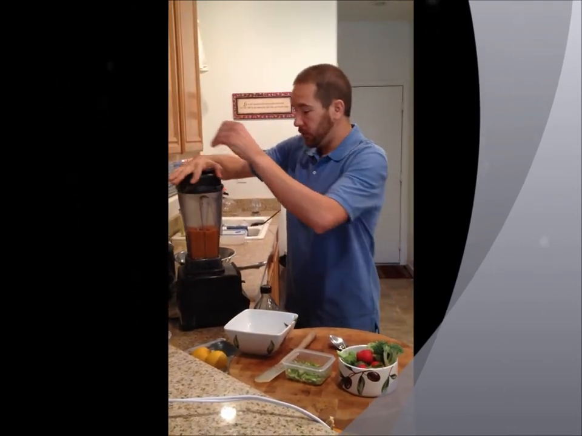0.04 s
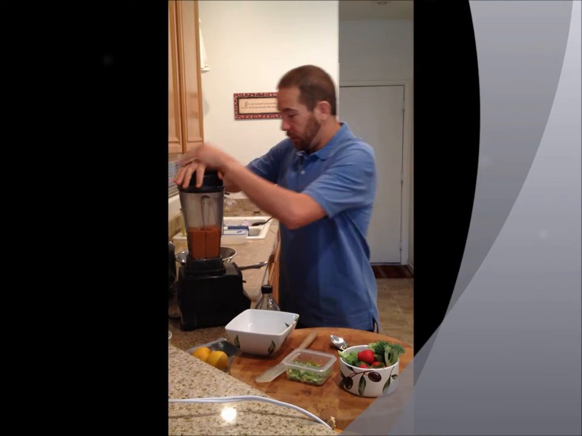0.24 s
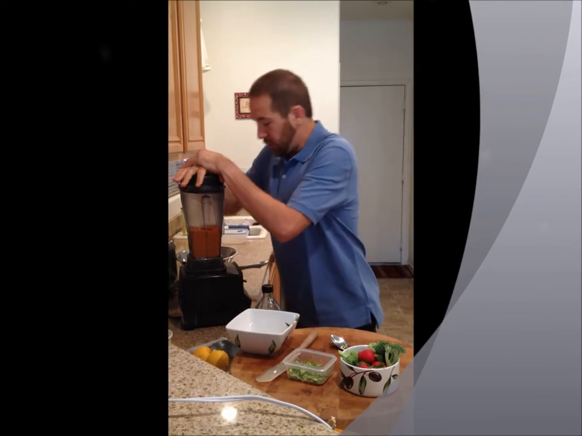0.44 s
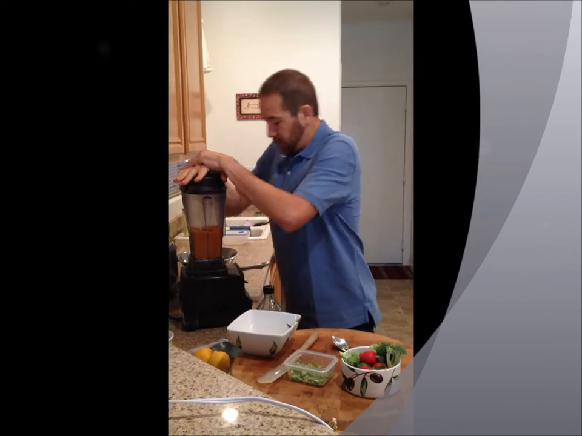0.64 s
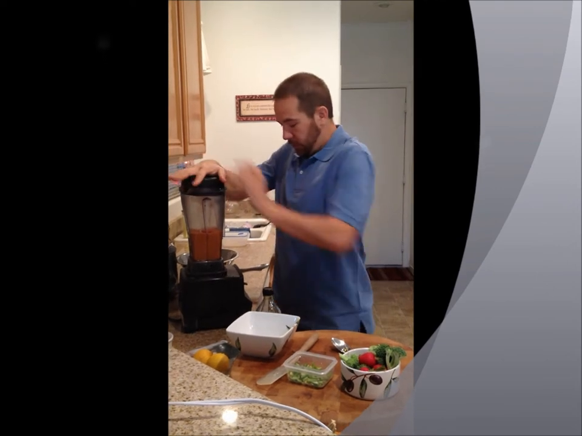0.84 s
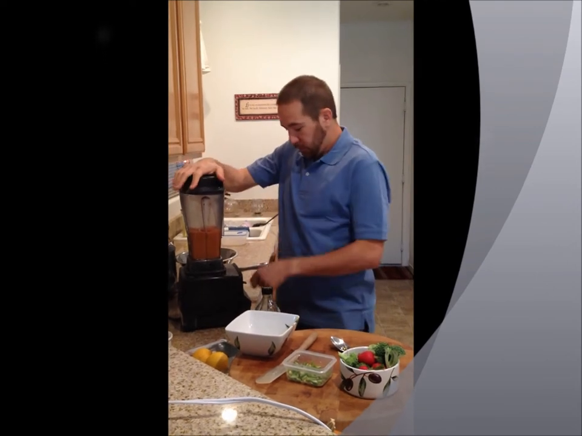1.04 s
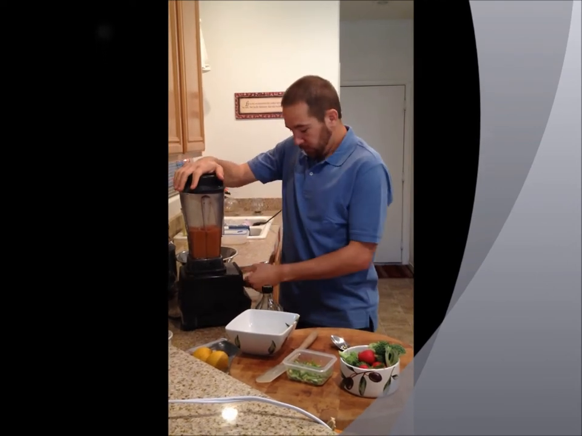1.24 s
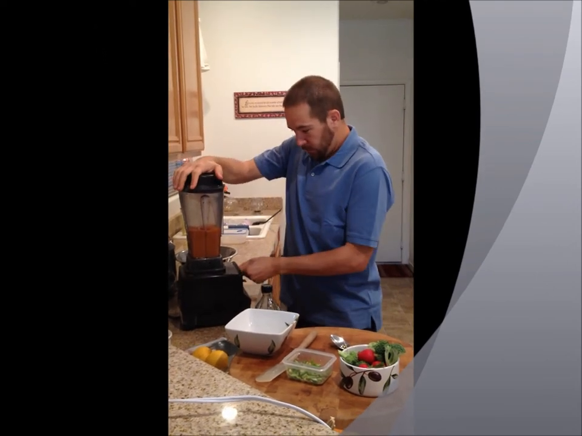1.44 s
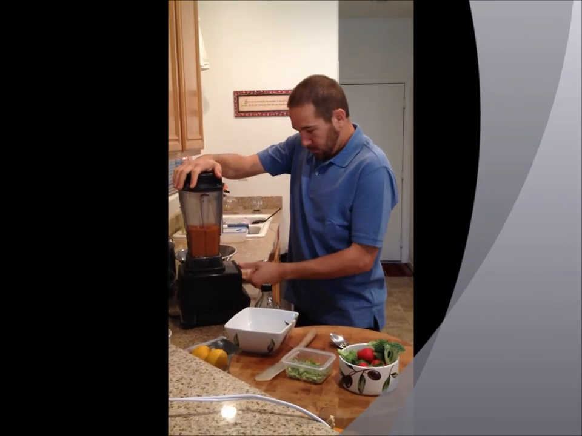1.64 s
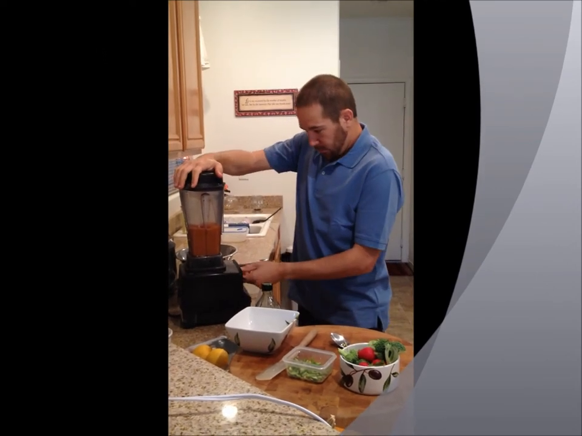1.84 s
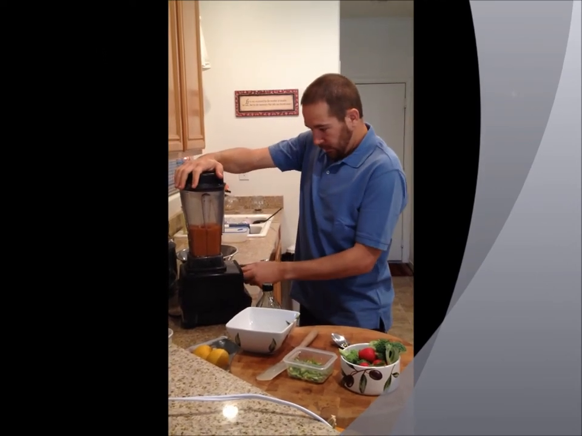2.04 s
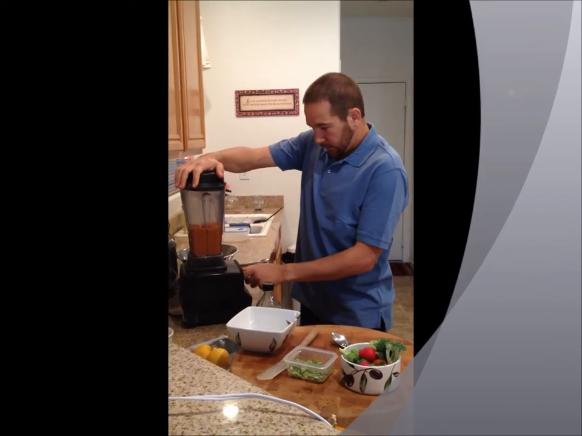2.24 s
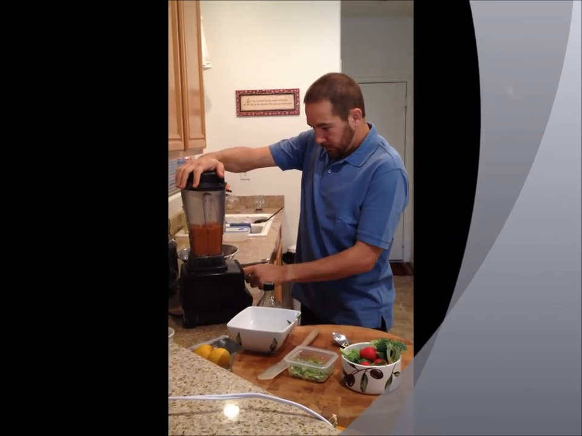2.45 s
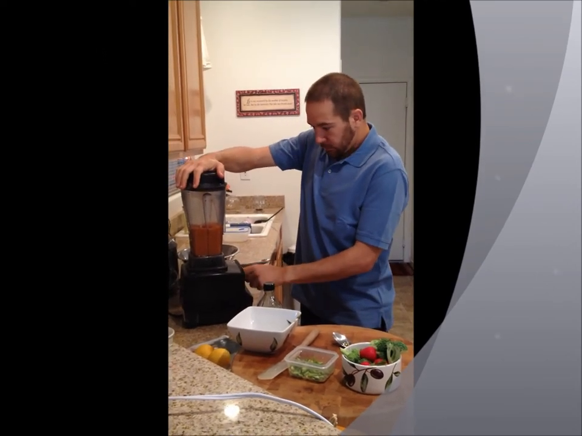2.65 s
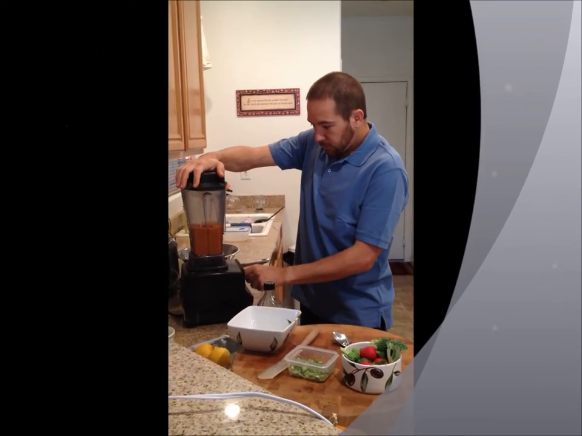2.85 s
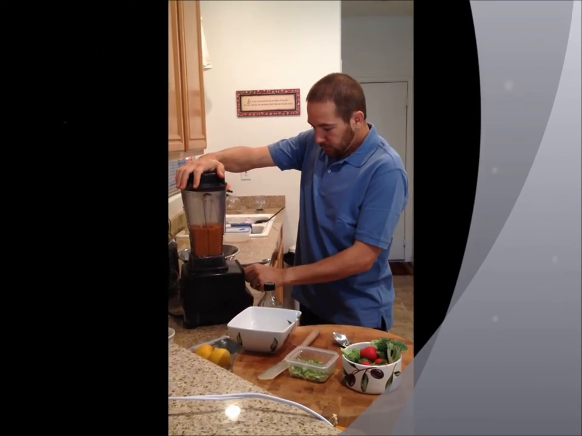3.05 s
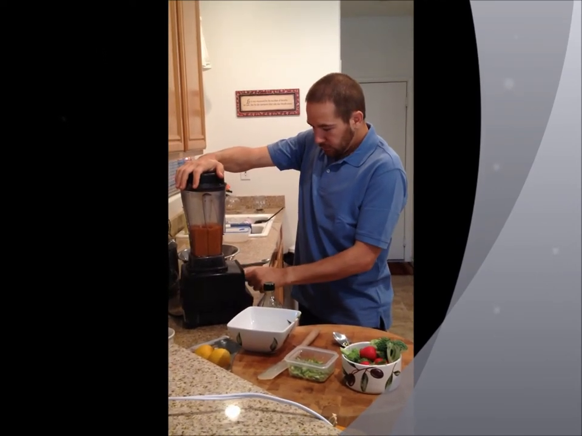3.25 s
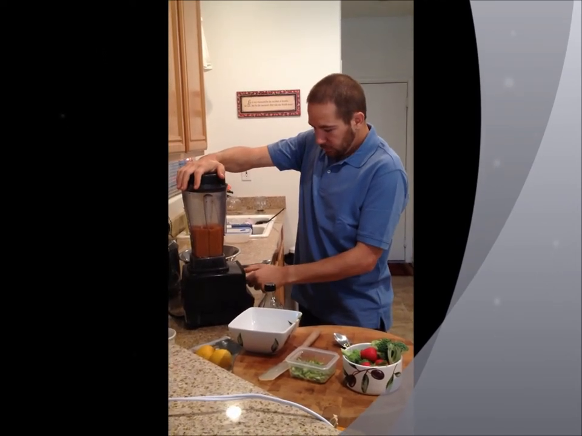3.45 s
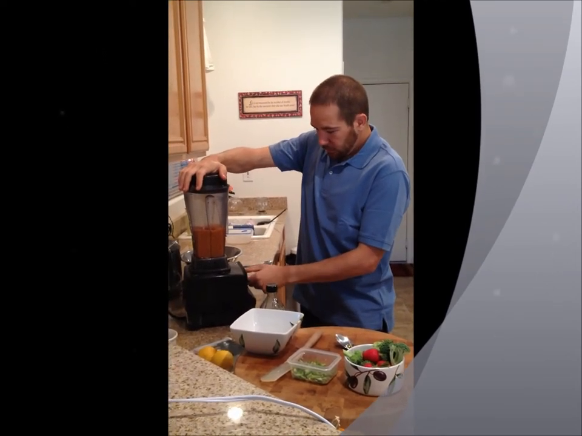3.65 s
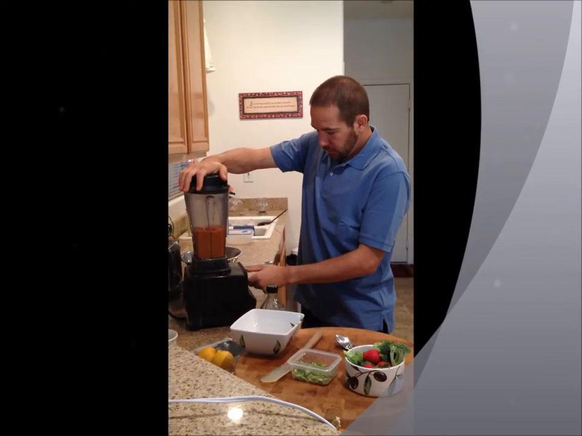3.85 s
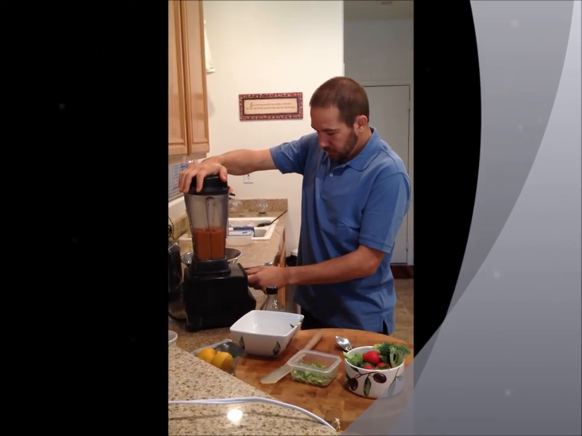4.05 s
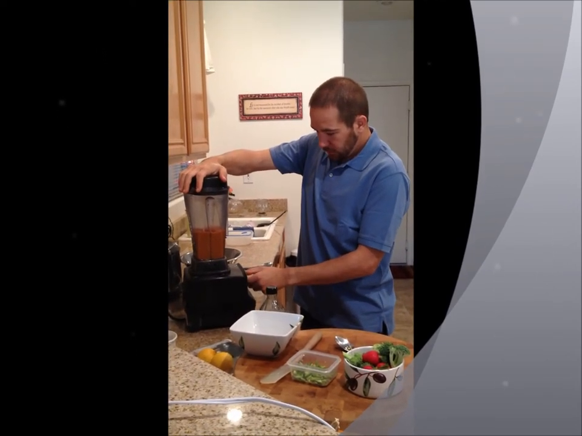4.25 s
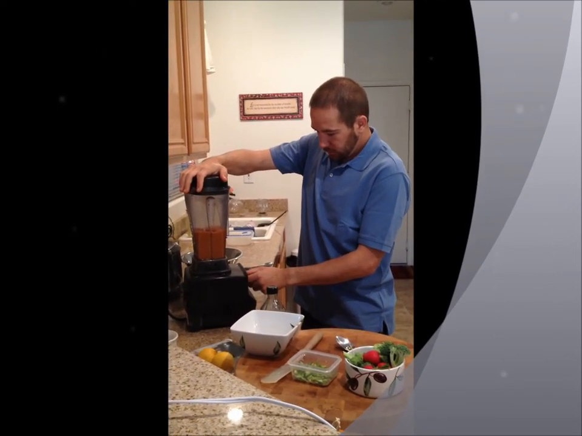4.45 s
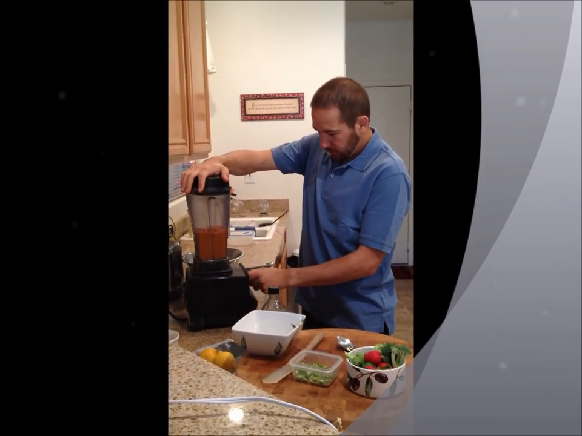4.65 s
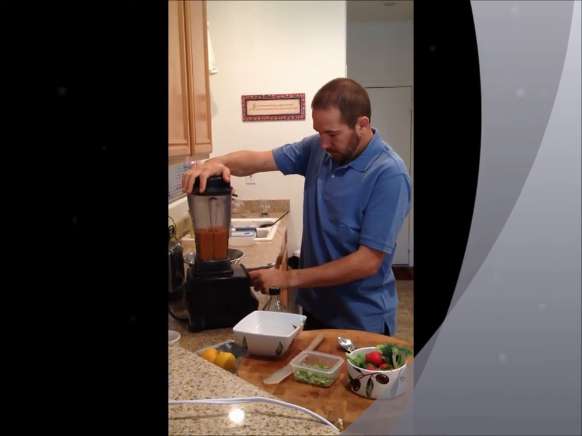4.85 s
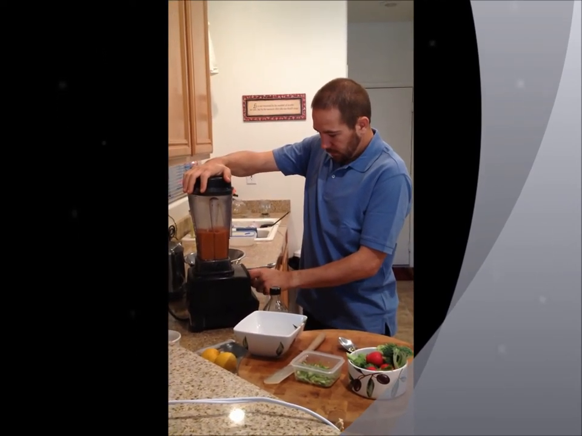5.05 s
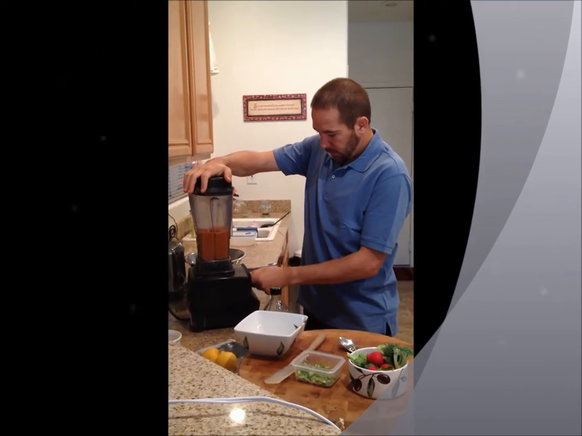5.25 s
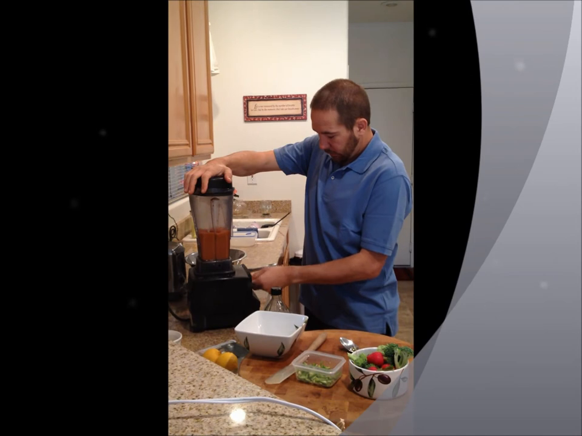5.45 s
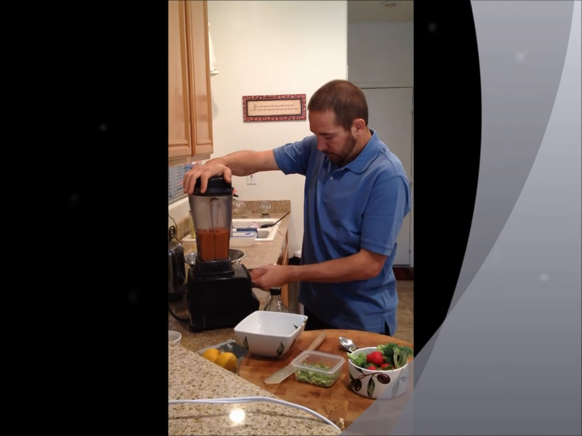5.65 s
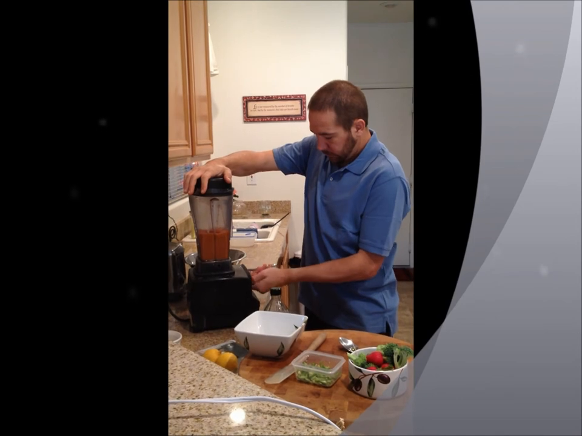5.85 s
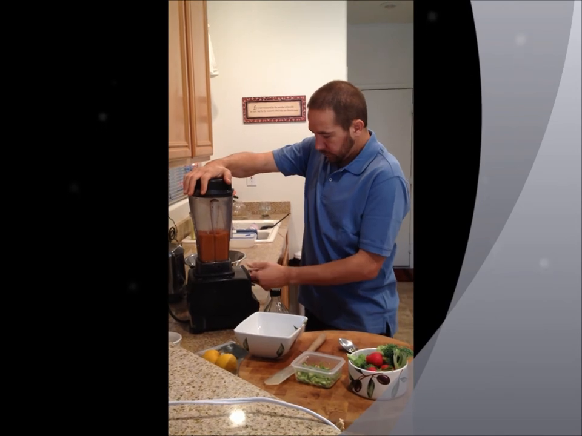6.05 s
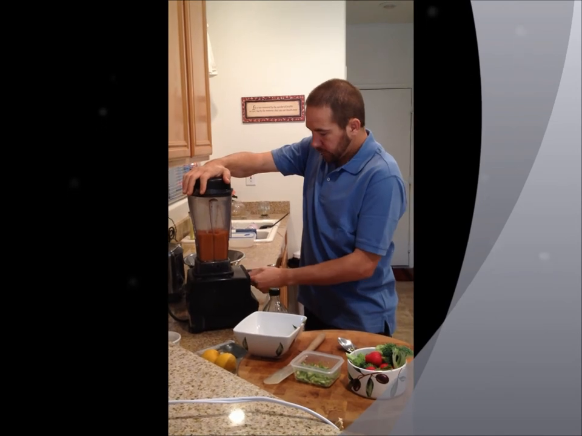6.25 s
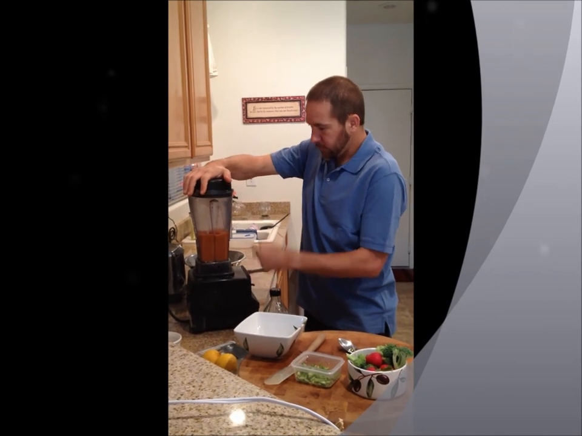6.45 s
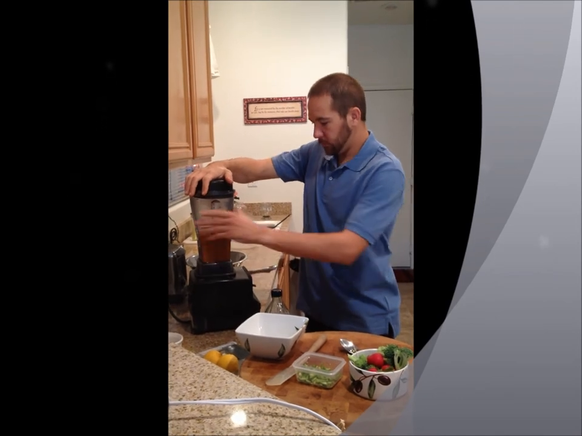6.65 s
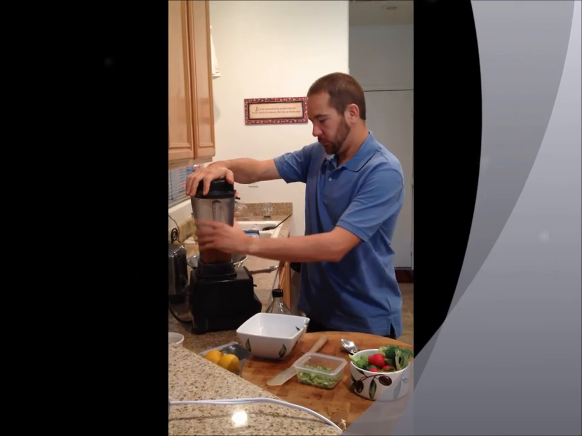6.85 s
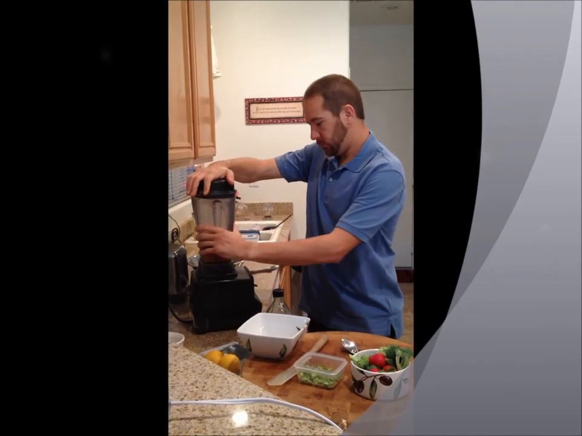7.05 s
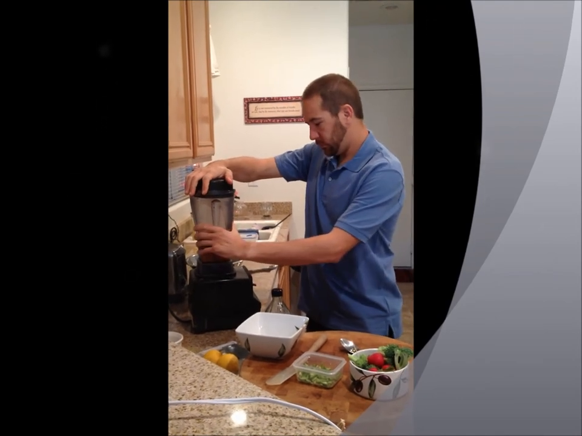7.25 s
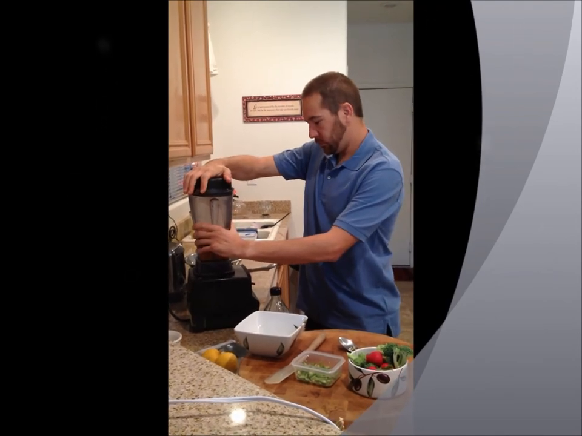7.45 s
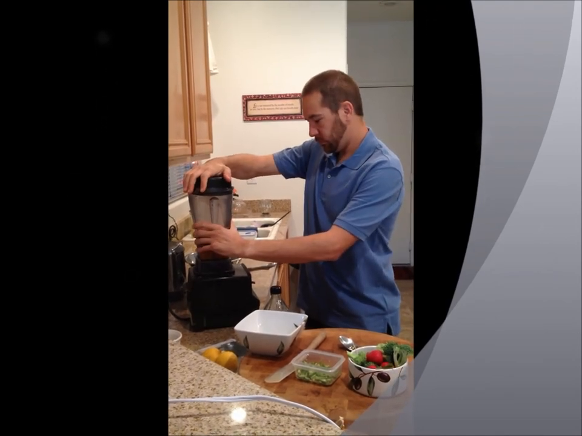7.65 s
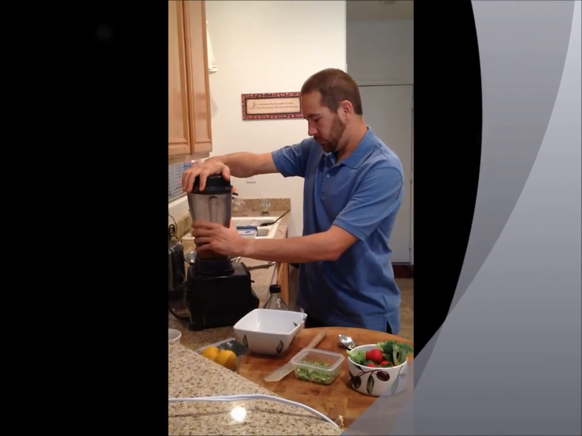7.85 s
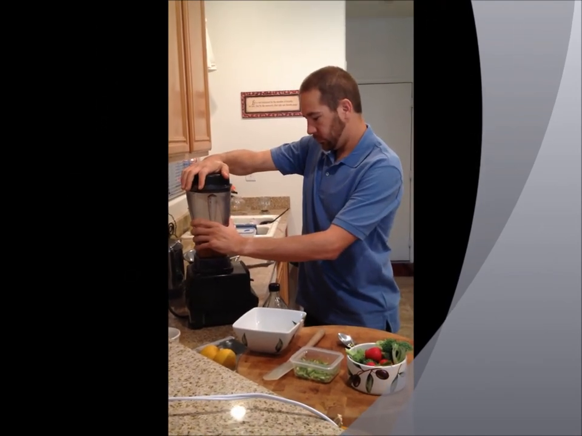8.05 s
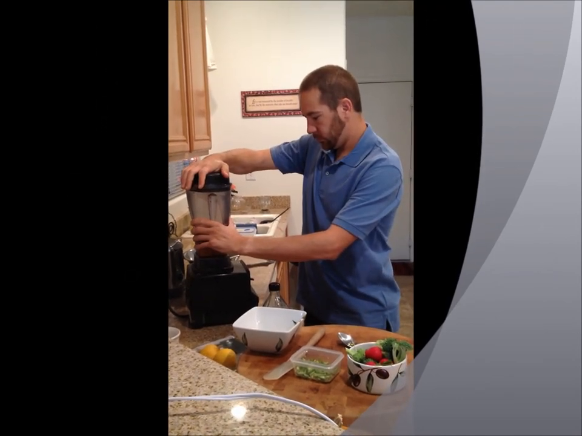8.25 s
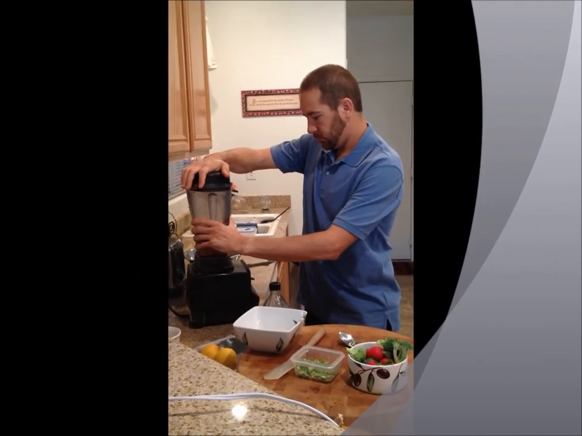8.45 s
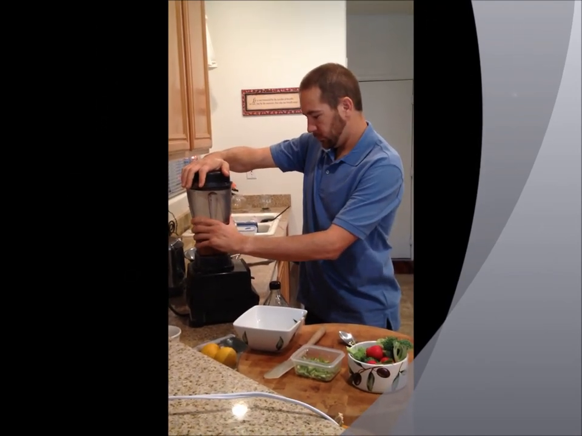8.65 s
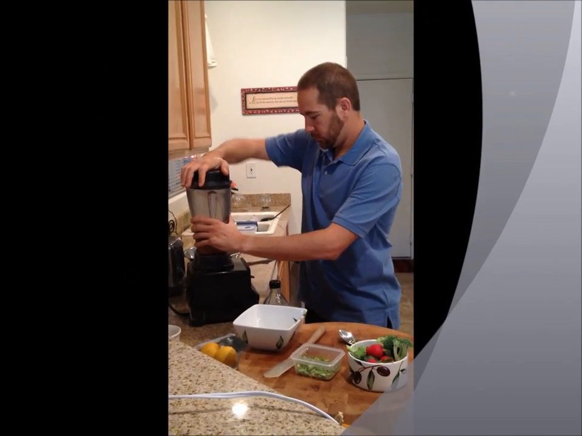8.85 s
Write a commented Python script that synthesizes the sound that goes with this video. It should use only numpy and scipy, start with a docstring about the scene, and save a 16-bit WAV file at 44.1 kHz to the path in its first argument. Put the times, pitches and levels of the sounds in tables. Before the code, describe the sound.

A faint kitchen murmur, slightly louder at first, begins with a tiny bright tick and soft hand brushing. At 0.4 s a firm double knock lands on the plastic lid, with a thud and short room echo. Faint touches come near 0.8 and 1.1 s, then crisp switch clicks at 1.4 s. From about 1.65 s the motor starts with buzzing pulses and uneven low knocks, jumps to a low growl by 2.4 s and holds briefly. From 2.8 s it climbs quickly, pauses at 3.4-3.7 s, then climbs again to a loud peak around 5.1 s: a throbbing hum, wet churning, broad hiss and unsteady whine. After 5.3 s the pitch starts sliding down; a bright click comes at 6.2 s and a duller knock at 6.8 s. The whirr thins and slows through 8 s, almost gone by 8.8 s, when a faint tick sounds. Single distant microphone, little bass.

```python
"""First a small dry tick, a brush of hands and a kitchen murmur that settles; then a blender on a stone counter.
Hands knock lid, base and switch: short bursts and ringing plastic, with the room's answer.
The motor starts with jolts, climbs in stages, then coasts down. It adds tones locked to the shaft, a whine,
and churning, hissing and shuddering noises that throb once a turn. One small microphone hears it across the room."""
import sys
import numpy as np
from scipy import signal
from scipy.fft import rfft, irfft, next_fast_len
from scipy.io import wavfile
from scipy.ndimage import uniform_filter1d, map_coordinates

SR = 44100
rng = np.random.default_rng(int(sys.argv[2]) if len(sys.argv) > 2 else 0)


def store_wav(level_fs):
    """Save 16-bit WAV to argv[1]."""
    pcm = np.round(np.clip(np.atleast_2d(level_fs), -1, 1) * 32767)
    wavfile.write(sys.argv[1], SR, pcm.T.astype(np.int16))


N = 392490
TIME = np.arange(N) / SR  # seconds

# Shaft speed in stages; coasting starts at the last row: t/s, speed/(turns/s)
SPEED = [(1.68, 12), (2.3, 52), (2.4, 65), (2.5, 65.5), (2.57, 62.8), (2.66, 66), (2.8, 72), (3.05, 89.1),
         (3.2, 119.2), (3.4, 165), (3.7, 165), (3.93, 185.2), (4.03, 214), (4.14, 249), (4.27, 265),
         (4.45, 301), (4.6, 318.4), (4.8, 339.1), (5.1, 358.7), (5.25, 356.7), (5.4, 331.2)]
COAST_S, COAST_POWER = 4.107, 2.009  # speed then falls as (1 - time / COAST_S) ** COAST_POWER
POWER_OFF_S = 6.06  # middle of the fade from the sound under power to the unpowered sound
# Shaft tones at 260 turns/s, before load and path: multiple of shaft speed, level/dB
SHAFT_TONES = [(1, -13.5), (2, -22), (3, -25), (4, -20), (5, -26), (6, -26), (7, -27), (8, -23), (9, -24),
               (10, -26), (11, -28), (12, -25), (13, -24), (14, -27), (15, -26), (16, -24), (17, -28),
               (18, -26), (19, -27), (20, -25), (21, -30), (22, -25), (23, -33), (24, -32)]
# How steady shaking reaches the microphone, with notches between modes: f/Hz, level/dB
SHAKE_PATH = [(90, -48), (135, -29), (168, -23), (190, -23), (214, -13), (226, -6), (234, -3), (241, -11),
              (249, -30), (256, -5), (262, 0), (270, -6), (281, -20), (293, -10), (315, -27), (345, -23),
              (390, -29), (442, -16), (475, -26), (520, -14.5), (600, -30), (685, -18), (735, -25),
              (785, -18), (815, -24), (880, -18), (990, -26), (1085, -21), (1200, -27), (1330, -17),
              (1450, -18), (1650, -21), (1800, -29), (2500, -38)]
# Modes of base and counter: f/Hz, width/Hz, level/dB
BASE_MODES = [(178, 13, -50), (236.4, 1.84, 1), (261.7, 7.6, 1), (296, 17, -6.5), (333.6, 7.1, -2.5),
              (419.5, 5.9, -21), (419, 8, -14), (465, 27, -18.5)]
# Peaks and dips of jar and casing: f/Hz, width/Hz, level over the smooth spectrum/dB
CASING_PEAKS = [(696, 55, 2), (842.5, 14, 5.5), (830, 90, 0), (1092.7, 21, 8), (1320, 110, 3),
                (1360, 23, 3), (1573, 10, 2.5), (2000, 200, 4), (2700, 140, 3), (4064, 150, 3.5),
                (4770, 220, 3.5), (5145, 360, -9.5), (6040, 490, 6), (6750, 130, 5), (7880, 37, -4),
                (7860, 56, 3.5), (6770, 50, 2), (8800, 88, 0), (9560, 110, -17)]
# Colour of the churning at full speed: f/Hz, level/dB
CHURN_FULL = [(240, -24.5), (400, 2), (486, -3.5), (1090, -0.5), (1580, -10.5), (2000, -10.5),
              (2270, -25.5), (3000, -28), (3900, -28), (6600, -120)]
# Colour of the churning at low speed: f/Hz, level/dB
CHURN_SLOW = [(260, -13.5), (450, -13), (604, -11.5), (934, 2.5), (1190, -8), (1390, -1), (2250, -15),
              (3000, -12.5), (3900, -13.5), (6600, -120)]
# Colour of the fan hiss at full speed: f/Hz, level/dB
FAN_FULL = [(1290, -22), (2200, -10.5), (3690, -7), (4680, -3), (5240, -4), (5980, -7.5), (7770, -6.5),
            (9160, -10), (10200, -18.5), (14500, -23), (15600, -24)]
# Colour of the fan hiss at low speed: f/Hz, level/dB
FAN_SLOW = [(1290, -8), (2200, -14), (2700, -39), (3500, -3), (4650, 3.5), (5170, 1.5), (5990, -8),
            (7580, -5), (9220, -20.5), (14200, -20.5), (15400, -45)]
# How each noise follows speed, one tuple per noise: level at 340 turns/s/dB, growth per tenfold speed/dB,
# speed below which it stops falling/(turns/s), extra under power/dB, random swell/dB,
# unpowered speed where the next column sets in/(turns/s), loss per tenfold below that (negative: gain)/dB,
# fully in at t/s
CHURN_LAW = (-28, 26, 8, 1, 0.52, 34, 34, 1.4)
FAN_LAW = (-28.5, 36.5, 10, 0.26, 0.26, 73, -7, 1.73)
SHUDDER_LAW = (-30.5, 31.5, 114, 1, 0.3, 137, 25, 2.5)
START_S = .03  # time scale of the noises' swell at the start
# Brief surges and dips of churn, hiss and shudder: t/s, churn/dB, hiss/dB, shudder/dB
SURGES = [(1.77, 8, 20, 5), (1.86, 1.5, -2, 5), (1.96, 1, 7, 3), (2.05, 8, 4.5, -7), (2.36, 5, 6.5, 3),
          (2.47, 1, -1.5, -14), (2.66, 7, 9.5, 7.5), (2.9, 1.5, 1, 1), (3.06, 0.5, 3.5, 4.5),
          (3.25, -1, 3, 11), (4.31, 1, -1, 3), (4.95, 3.5, 1.5, 3), (5.22, 3, 2.5, -0.5),
          (6.15, 0.5, -2, -2), (6.61, -1.5, 2.5, 2), (6.87, -1, 1.5, -8), (7.2, -0.5, 3.5, -8),
          (7.62, 3.5, 4.5, 4)]
SURGE_RISE_S, SURGE_FALL_S = .035, .09
# Mains-rate pulses shake the base as the motor starts and gathers speed
MAINS_HZ = 60
PULSE_S, PULSE_RISE_S, PULSE_END_S, PULSE_DB = 1.628, 0.076, 2.5, -38  # start, swell, end, peak level
# How the casing radiates the magnetic whine of the rotor slots: f/Hz, level against the fan hiss/dB
SLOT_RADIATION = [(2000, -26), (2300, -10), (2420, 5), (2520, 0), (2640, 9), (2760, -1), (2880, 2),
                  (3050, -18), (3800, -5), (4600, -20), (6000, -12), (7600, -8)]
# How the motor's brush ticks reach the air: f/Hz, level against the fan hiss/dB
TICK_RADIATION = [(6000, -46), (9000, -25), (11500, -20), (14000, -19)]
# The slow rotor lurches and knocks the base: t/s, peak level of one knock/dB
LURCHES = [(1.74, -35), (1.772, -32.5), (1.822, -31), (1.853, -34), (1.885, -36), (1.943, -33.5),
           (1.982, -36), (2.026, -33), (2.058, -36), (2.104, -36)]
# Knocks, clicks and ticks: t/s, level before a 4 dB lift/dB, middle of the crack f/Hz,
# then levels against that: thud/dB, clack/dB, brightness/dB, ring/dB
KNOCKS = [(0.38, -23.5, 2800, -11, -11.5, -7, -30), (0.3845, -31, 1790, -4, -10, -20, -30),
          (0.831, -46, 5910, -26, -21, -15, -15), (1.134, -49.5, 2060, 0, -4, -23, -13),
          (1.323, -42.5, 870, -30, -27, -30, -22), (1.412, -27.5, 4030, -32, -24, -19, -10),
          (1.418, -30, 4130, -30, -26, -14, -27), (1.425, -42, 4000, -30, -24, -22, -14),
          (1.5622, -48.5, 900, -25, -15, -20, -10), (1.7378, -42, 1100, -2.5, -2, -12, -13),
          (1.775, -38, 5570, -18, -30, -19, -22), (1.825, -43.5, 3480, 0, -1, -22, -17),
          (1.932, -36.5, 8460, -16, -30, -7, -17), (2.038, -42, 4020, -8, -4, -24, -14),
          (2.354, -46, 2650, 5, -1, -24, -17), (2.649, -37, 4010, -12, -19, -22, -17),
          (6.165, -23, 4530, -35, -18, 2, -8), (6.7763, -38, 4640, -23, 2, -23, -17),
          (8.8308, -44.5, 4670, -22, -28, -16, -13)]
# Ringing of lid and switch plate: f/Hz, level before a random change/dB, time to fall 60 dB/s
PLASTIC = [(780, -4, .06), (1090, -6, .05), (1750, -10, .04), (4150, 0, .05), (4740, -2, .06),
           (5750, -12, .03), (6700, -6, .04)]
# Small dry ticks at the very start: t/s, level before the soft onset/dB, f/Hz
SNAPS = [(0.0137, -18.5, 8100), (0.04, -38, 7000), (.097, -40, 4870), (.119, -45, 6500)]
SNAP_T60_S = 0.0039  # time to fall 60 dB
# Hands on lid and base: t/s, rise/s, hold/s, level/dB
BRUSH = [(0.006, 0.016, 0.2, -64), (0.707, 0.02, .005, -49), (1.13, 0.083, 0.1, -53.5)]
BRUSH_RISE_DB, BRUSH_FADE_DB_PER_S = 23, 160  # climb during the rise; fall after the hold
# Colour of skin on plastic: f/Hz, level/dB
SKIN = [(710, -36), (1200, -6), (1390, -7), (1460, -13), (2410, -5.5), (4120, -5), (10400, -14.5),
        (11900, -19), (15600, -13)]
# Colour of the quiet kitchen: f/Hz, level/dB
AIR = [(15, -65), (25, -23), (188, -10.5), (210, -4), (323, -13.5), (360, -8), (411, -17.5), (446, -7.5),
       (484, -17), (524, -16), (974, -22), (1060, -26.5), (7500, -39.5), (10300, -45.5), (12500, -42.5),
       (15600, -44)]
AIR_DB = -52.5
OPENING_DB, OPENING_S = 4.5, 0.19  # the murmur is louder at first and settles
# How long the kitchen rings: f/Hz, time to fall 60 dB/s
KITCHEN_RING = [(150, 0.31), (400, 0.36), (1040, 0.37), (2760, 0.4), (7280, 0.25), (14000, 0.36)]
TOP_HZ = 15400  # the recorder's band limit


def motor():
    """A turning shaft shakes the base and sends noise and whine into the air, which the room answers."""
    speed = shaft()
    turn = 2 * np.pi * np.cumsum(speed * (1 + .002 * wobble(30))) / SR
    driven = 1 / (1 + np.exp(np.clip((TIME - POWER_OFF_S) / .2, -50, 50)))  # 1 = under power
    churn_db = loudness(CHURN_LAW, speed, driven, column=0)
    fan_db = loudness(FAN_LAW, speed, driven, column=1)
    shudder_db = loudness(SHUDDER_LAW, speed, driven, column=2)
    airborne = roar(speed, turn, churn_db, fan_db) + whine(speed, turn, driven, fan_db)
    echo = amp(-4) * room(airborne)[:N]
    return shaft_tones(speed, turn, driven) + shudder(turn, shudder_db) + airborne + echo


def shaft():
    """Turns per second: in stages with the dial, then coasting against drag."""
    seconds, turns = np.transpose(SPEED)
    off_s, top = SPEED[-1]
    coast = top * np.clip(1 - (TIME - off_s) / COAST_S, 0, 1) ** COAST_POWER
    return np.where(TIME > off_s, coast, np.interp(TIME, seconds, turns, 0, 0))


def shaft_tones(speed, turn, driven):
    """The out-of-balance force grows with speed and shakes the base at multiples of the shaft rate."""
    # the blades bite once the puree circulates; this load shakes the overtones apart
    load = driven * np.clip((speed - 66) / 25, 0, 1)
    total = np.zeros(N)
    for k, db in SHAFT_TONES:
        growth = 1.3 if k == 1 else .9 if k < 12 else .6
        force = (speed / 260) ** growth * np.clip(speed / 54, 0, 1) ** 2
        level_db = db + (k > 1) * (2.5 * wobble(13) - 3 * load)
        jitter = .04 * k * (1 + load) * wobble(35)
        total += force * amp(level_db) * np.sin(k * turn + k * k + jitter)

    def ringing(f):
        """Path and casing; below 400 Hz the sound is 25 ms late, as low modes take time to ring up."""
        return amp(along(SHAKE_PATH, f)) * casing(f) * np.exp(-2j * np.pi * np.minimum(f, 400) * .025)

    return filtered(total, ringing)


def shudder(turn, level_db):
    """Noise shakes the whole counter, so its modes stand out a little less."""
    blunt = lambda f: np.abs(base(f)) ** 0.96 / (1 + (f / 520) ** 6)
    return amp(level_db) * unit(filtered(throb(turn, 0.41) * rush(1.1), blunt))


def roar(speed, turn, churn_db, fan_db):
    """Churning food and fan hiss, blending from low-speed to full-speed colour."""
    fast = np.clip(speed / 340, 0, 1) ** 2.2

    def voice(spectrum, depth):
        """Throbbing noise coloured by a spectrum and the casing."""
        colour = lambda f: amp(along(spectrum, f)) * casing(f)
        return unit(filtered(throb(turn, depth) * rush(1.51), colour))

    def blend(slow, full, depth):
        """Crossfade two colours by speed."""
        return np.sqrt(1 - fast) * voice(slow, depth) + np.sqrt(fast) * voice(full, depth)

    churn = amp(churn_db) * blend(CHURN_SLOW, CHURN_FULL, 0.25)
    return churn + amp(fan_db) * blend(FAN_SLOW, FAN_FULL, 0.13)


def whine(speed, turn, driven, fan_db):
    """A magnetic whine at 22 cycles a turn, with its multiples as the ticks of the motor's brushes."""
    def bar(k):
        """One unsteady multiple, silent where too high to represent."""
        jitter = 1.2 * k ** .5 * wobble(150 * np.sqrt(k))
        wave = np.sin(22 * k * turn + jitter)
        return amp(fan_db + 4.5 * wobble(25)) * wave * (22 * k * speed < SR / 2)

    # at low speed the whine splits into side tones
    labouring = np.clip((160 - speed) / 30, 0, 1)
    split = 1 + 1.3 * labouring * np.cos(2 * turn + .5 * wobble(60))
    slots = bar(1) * split * (.1 + .9 * driven)
    ticks = sum(amp(-(.6 + .4 * driven) * k + 1) * bar(k) for k in range(2, 14))
    slots = filtered(slots, lambda f: amp(along(SLOT_RADIATION, f)))
    return slots + filtered(ticks, lambda f: amp(along(TICK_RADIATION, f)))


def throb(turn, depth):
    """Loudness rising and falling once a turn."""
    return 1 + np.clip(depth, 0, 1) * np.cos(turn)


def loudness(law, speed, driven, column):
    """Level in dB of one noise: a law of speed, plus brief surges and dips."""
    full_db, grow_db, idle, power_db, swell_db, settle, settle_db, start_s = law
    db = full_db + grow_db * np.log10(np.maximum(speed, idle) / 340)
    db += power_db * driven + swell_db * wobble(12)
    slow = np.maximum(speed, SPEED[0][1])
    db -= settle_db * (1 - driven) * np.log10(np.maximum(settle / slow, 1))
    for s, *added in SURGES:
        away = np.where(TIME < s, (TIME - s) / SURGE_RISE_S, (s - TIME) / SURGE_FALL_S)
        db += added[column] * np.exp(away)
    return db - 20 * np.clip((start_s - TIME) / START_S, 0, 3) ** 2


def starting_jolts():
    """Mains-rate pulses and rotor lurches, each making the base boom near 250 Hz."""
    t = np.arange(PULSE_S, PULSE_END_S, 1 / MAINS_HZ)
    places = np.round(t * SR).astype(int)
    size = np.clip((t - PULSE_S) / PULSE_RISE_S, 0, 1) * (PULSE_END_S - t) / (PULSE_END_S - PULSE_S)
    pulses, lurches = np.zeros(N), np.zeros(N)
    pulses[places] = size * amp(2.5 * wobble(60)[places])
    for s, db in LURCHES:
        lurches[round(s * SR)] = amp(db)
    boom = lambda width_hz: lambda f: (1j * f * width_hz / (250 ** 2 - f * f + 1j * f * width_hz)) ** 2
    thump = filtered(pulses, boom(110))
    one_lurch = filtered(1. * (np.arange(SR // 4) == 0), boom(47))
    return amp(PULSE_DB) * peak(thump) + signal.fftconvolve(lurches, peak(one_lurch))[:N]


def knocks():
    """Each contact: a crack and ringing plastic, a duller clack, a thud into the counter, and the room's answer."""
    out, t = np.zeros(N + 2 * SR), np.arange(SR // 4) / SR

    def band(lo_hz, hi_hz):
        """A gentle filter that passes between two frequencies."""
        return lambda f: (1j * f / lo_hz / (1 + 1j * f / lo_hz)) ** 2 / (1 + 1j * f / hi_hz) ** 2

    def burst(t60, colour):
        """Dying noise, scaled to peak 1."""
        return peak(filtered(amp(-60 * t / t60) * rng.standard_normal(len(t)), colour))

    for s, db, crack_hz, thud_db, clack_db, bright_db, ring_db in KNOCKS:
        ring = sum(amp(level + rng.normal(0, 3) - 60 * t / t60) * np.sin(2 * np.pi * hz * t)
                   for hz, level, t60 in PLASTIC)
        crack = filtered(1. * (t == 0), lambda f: band(crack_hz, crack_hz * 1.5)(f) ** 3)
        hit = amp(ring_db) * peak(ring) + amp(-3.5) * peak(crack)
        hit += amp(bright_db) * burst(0.00033, lambda f: band(12000, 24000)(f) ** 0.87)
        hit += amp(clack_db) * burst(0.02, lambda f: band(560, 900)(f) ** 2)
        hit += amp(thud_db) * burst(0.028, lambda f: band(140, 250)(f) ** 2.6)
        wet = amp(9.5) * room(hit)
        wet[:len(t)] += hit
        out[round(s * SR):][:len(wet)] += amp(db + 4) * wet
    return out[:N]


def snaps():
    """Ticks of a few cycles each, without echo."""
    out, t = np.zeros(N + SR), np.arange(SR // 50) / SR
    onset = 1 - np.exp(-t / 0.00015)
    for s, db, hz in SNAPS:
        out[round(s * SR):][:len(t)] += amp(db - 60 * t / SNAP_T60_S) * onset * np.sin(2 * np.pi * hz * t)
    return out[:N]


def hands():
    """Skin and sleeve brushing over plastic: each stroke of noise rises, holds and fades."""
    strokes = np.zeros(N)
    for s, rise, hold, db in BRUSH:
        below_db = BRUSH_RISE_DB * np.clip(1 - (TIME - s) / rise, 0, 9)
        faded_db = BRUSH_FADE_DB_PER_S * np.maximum(TIME - s - rise - hold, 0)
        strokes += amp(db - below_db - faded_db)
    return strokes * unit(filtered(rush(1.8), lambda f: amp(along(SKIN, f))))


def kitchen():
    """Shaped noise for the low murmur of appliances and air, and the microphone's hiss."""
    drift_db = .8 * wobble(2)
    opening_db = OPENING_DB * np.exp(-TIME / OPENING_S)
    murmur = unit(filtered(rush(0.87), lambda f: amp(along(AIR, f))))
    return amp(AIR_DB + drift_db + opening_db) * murmur


def room(x):
    """The kitchen's answer: a noise tail in which each frequency dies at its own speed."""
    hz, t, z = signal.stft(rng.standard_normal(SR // 2), SR, nperseg=256)
    fade = amp(-60 * t / along(KITCHEN_RING, hz)[:, None])
    tail = signal.istft(z * fade, SR, nperseg=256)[1]
    return signal.fftconvolve(x, tail / np.linalg.norm(tail))


def base(f):
    """The modes of base and counter, ringing in phase."""
    return sum(amp(db) * 1j * f * w / (c * c - f * f + 1j * f * w) for c, w, db in BASE_MODES)


def casing(f):
    """Peaks and dips that jar and casing lay on the sound."""
    return amp(sum(db / (1 + (2 * (f - c) / w) ** 2) for c, w, db in CASING_PEAKS))


def rush(patchy_db):
    """White noise with patches of random gain in time and frequency."""
    z = signal.stft(rng.standard_normal(N), nperseg=512)[2]
    field = uniform_filter1d(uniform_filter1d(rng.standard_normal(z.shape), 5, 0), 9, 1)
    return signal.istft(z * amp(patchy_db * unit(field)), nperseg=512)[1][:N]


def wobble(rate):
    """A smooth random curve, rate knots a second."""
    return map_coordinates(rng.standard_normal(int(N * rate / SR) + 4), [np.arange(N) * rate / SR])


def filtered(x, response):
    """x shaped by a complex response of frequency."""
    m = next_fast_len(len(x) + SR // 2)
    return irfft(rfft(x, m) * response(np.fft.rfftfreq(m, 1 / SR)), m)[:len(x)]


def along(points, hz):
    """Read (f/Hz, value) points on a log frequency axis."""
    f, v = np.transpose(points)
    return np.interp(np.log(hz + 1), np.log(f + 1), v)


def amp(db):
    """Gain of a level in dB."""
    return 10 ** (np.asarray(db) / 20)


def unit(x):
    """x scaled to an average power of 1."""
    return x / np.sqrt(np.mean(x ** 2) + 1e-20)


def peak(x):
    """x scaled to peak 1."""
    return x / np.abs(x).max()


def scene():
    """Add all sources; one microphone feeds both channels."""
    return np.tile(motor() + starting_jolts() + knocks() + snaps() + hands() + kitchen(), (2, 1))


def record(dry):
    """The microphone cuts the bass steeply; the recorder keeps nothing above its band limit."""
    bass_cut = lambda f: np.maximum(1 / np.sqrt(1 + (135 / (f + 1)) ** 14), amp(-22.5))
    return np.array([filtered(x, lambda f: bass_cut(f) * (f < TOP_HZ)) for x in dry])


dry = scene()
out = record(dry)
store_wav(out)
```